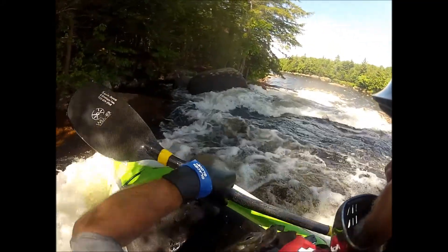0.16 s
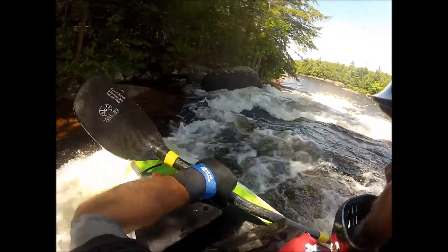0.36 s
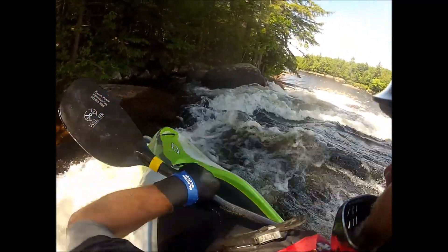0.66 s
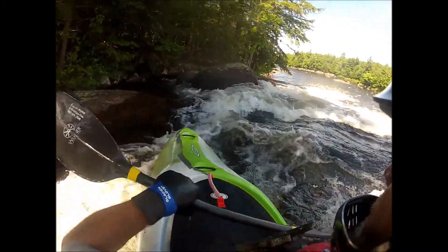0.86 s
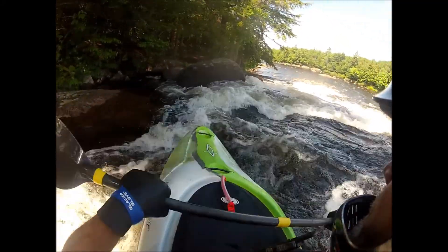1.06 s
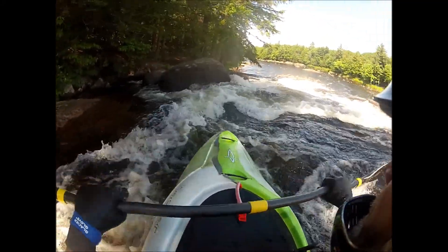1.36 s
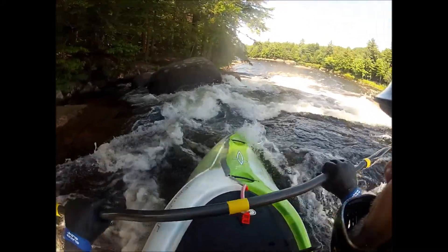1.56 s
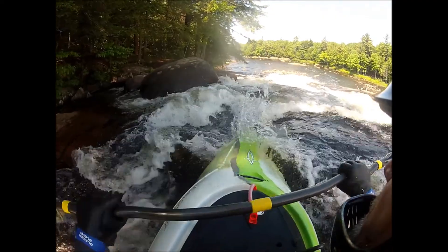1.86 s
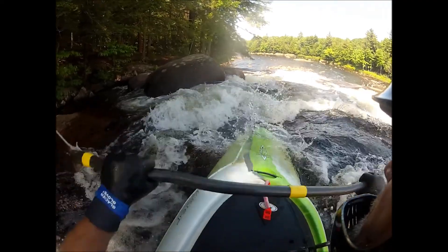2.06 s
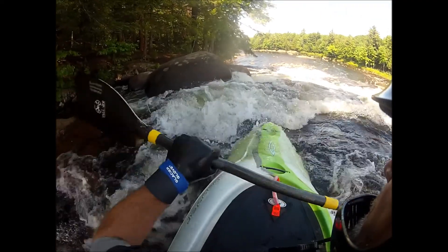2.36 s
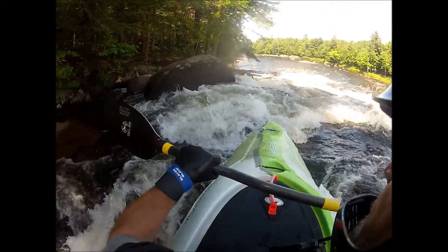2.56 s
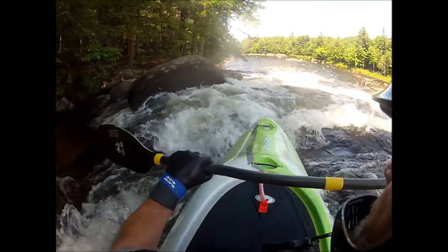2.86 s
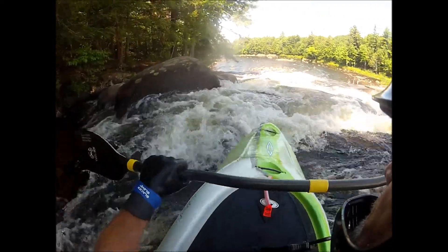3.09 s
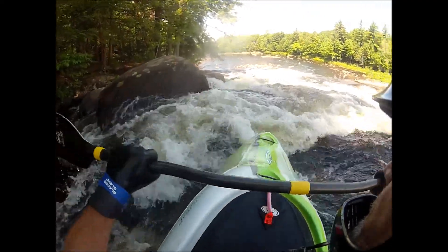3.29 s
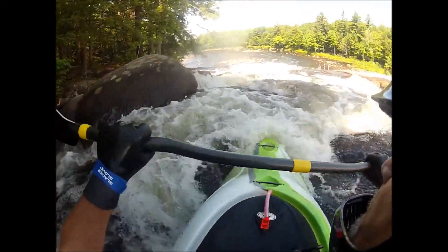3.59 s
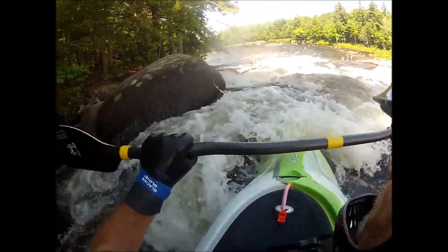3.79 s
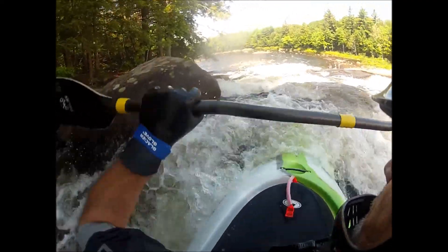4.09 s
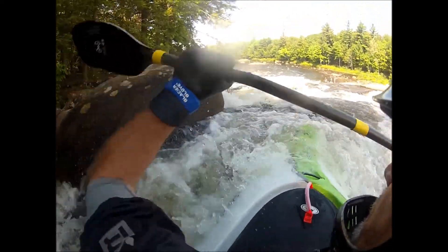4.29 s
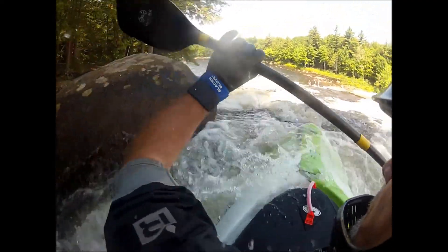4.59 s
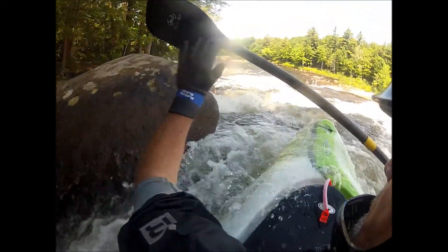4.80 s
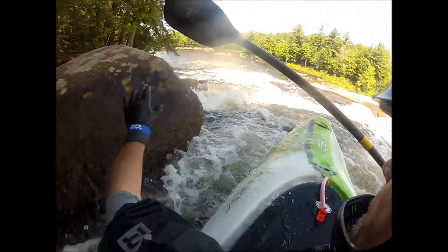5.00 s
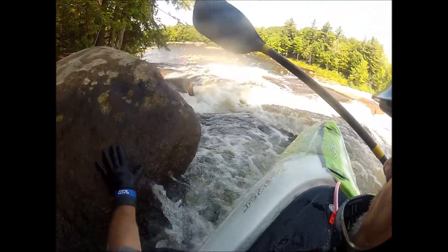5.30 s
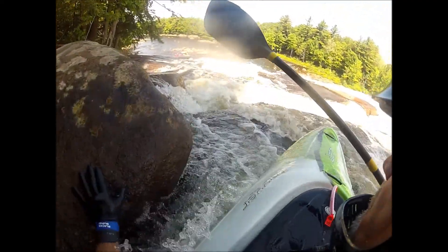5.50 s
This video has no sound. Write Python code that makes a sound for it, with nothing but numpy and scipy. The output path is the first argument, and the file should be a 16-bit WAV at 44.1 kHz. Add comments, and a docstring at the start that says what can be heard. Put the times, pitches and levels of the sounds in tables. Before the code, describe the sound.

Whitewater roars continuously around a kayak, heard from inside a closed waterproof camera housing, so it sounds boxy, midrange-heavy and tinny. Light taps of flung drops come early, a sharper knock at about 2.6 seconds, then a breaking wave brings churning, a very loud hollow crack near 3.8 seconds, low thuds and gulping air. The roar then steadies, with one more clear knock near the end. Both channels sound the same.

```python
"""A kayak runs a whitewater drop, heard from inside a camera's waterproof housing.
From the start, filtered noise and bubbles make the rapid's roar, and slow noise makes the rumble of waves.
Then flung drops knock on the shell as short ringing blows, spray patters on it and the treble dips briefly.
A breaking wave later churns the water, while sine tones rising in pitch make pockets of air gulp.
Throughout, the recorder holds its samples at a low rate, which adds a tinny sheen."""
import sys
import numpy as np
from scipy import signal
from scipy.fft import rfft, irfft, next_fast_len
from scipy.io import wavfile
from scipy.ndimage import map_coordinates

SR = 44100
rng = np.random.default_rng(int(sys.argv[2]) if len(sys.argv) > 2 else 0)


def persist_wave(psi):
    """Save psi, clipped to +-1, as 16-bit WAV."""
    counts = np.round(np.clip(psi, -1, 1) * 32767).astype(np.int16)
    wavfile.write(sys.argv[1], SR, np.atleast_2d(counts).T)


N = 249165

# Resonances of the housing: (pitch [Hz], width [Hz], level for outside sound [dB], level for a direct blow [dB])
HOUSING = [(539, 170, -3, -16.5), (787.6, 50, 2.5, 0.5), (905, 185, -2, -7), (1136.4, 109, -4, 2),
           (1264, 37, 2, -4.5), (1404, 71, -11, -18.5), (1906, 70, -23, -18.5)]
# Drops striking the housing; drops() adds 1 ms to the time and 1, 7 and 1 dB to the levels:
# (time [s], peak level of the ring [dB], level of the thud [dB], level of the crack [dB])
DROPS = [(0.381, -26, -38.5, -47), (0.733, -21.5, -40, -62.5), (2.564, -11, -38, -35.5),
         (3.575, -17.5, -22.5, -48.5), (3.788, 1, -28, -19.5), (3.829, -17, -26, -48),
         (4.051, -19, -24.5, -52), (4.434, -31.5, -30.5, -47.5), (4.538, -20, -38, -54),
         (4.583, -23, -36.5, -45), (4.878, -18.5, -41.5, -44.5), (5.458, -11, -37.5, -39)]


def amp(db):
    """Turn decibels into a gain."""
    return 10 ** (np.asarray(db) / 20)


def unit(x):
    """Scale a sound to an rms (average strength) of 1."""
    return x / np.sqrt(np.mean(x ** 2) + 1e-20)


def curves(rows):
    """Draw straight lines between the rows: one value per sample for each column after the time."""
    times, *columns = np.transpose(rows)
    t = np.arange(N) / SR
    return [np.interp(t, times, column) for column in columns]


def wobble(rate):
    """Make a smooth random curve through `rate` random points a second."""
    points = rng.standard_normal(400)
    return map_coordinates(points, [np.arange(N) * rate / SR], mode="wrap")


def filtered(x, response):
    """Multiply each frequency in x by response(Hz), which may be complex."""
    n = x.shape[-1]
    padded = next_fast_len(n + SR // 10)  # room for ringing after the end
    spectrum = rfft(x, padded) * response(np.fft.rfftfreq(padded, 1 / SR))
    return irfft(spectrum, padded)[..., :n]


def coloured(x, spectrum):
    """Shape x by (Hz, dB) points joined on a log pitch axis, then scale it to rms 1."""
    f, db = np.transpose(spectrum)
    return unit(filtered(x, lambda hz: amp(np.interp(np.log(hz + 1), np.log(f), db))))


def resonate(x, modes):
    """Ring x through resonances (Hz, width Hz, dB), each of which rings only after it is driven."""
    def response(f):
        total = 0
        for k, (centre, width, db) in enumerate(modes):
            damping = 1j * f * width
            sign = (-1) ** k  # neighbouring modes move in opposite directions
            total = total + sign * amp(db) * damping / (centre ** 2 - f ** 2 + damping)
        return total
    return filtered(x, response)


def water(bubble_hz, per_second, cycles, spread_db, bubbles_db):
    """Mix turbulent noise with a crowd of bubbles, each a short ring rising in pitch; rms 1."""
    noise = rng.standard_normal(N)
    draw = rng.random((int(per_second * N / SR), 3))  # place, pitch and size of each bubble
    t = np.arange(SR // 40) / SR
    hz = bubble_hz * 2 ** (2 * draw[:, 1:2] - 1)  # up to an octave either way
    size = amp(spread_db * np.minimum(-np.log(1 - draw[:, 2:]), 4))  # many small, few large
    age = hz * t / cycles
    rising = 1 + 0.044 * np.minimum(age, 2)
    rings = size * np.exp(-2 * age) * np.sin(2 * np.pi * hz * t * rising)
    where = (draw[:, :1] * N).astype(int) + np.arange(len(t))
    crowd = np.bincount(where.ravel(), rings.ravel(), N)[:N]
    return unit(noise + amp(bubbles_db) * unit(crowd))


def rapid():
    """Breaking water drives the upper housing modes, slosh the lower; churn lies below, spray hiss above."""
    # strength of the rapid, strongest at the start: (time [s], level [dB])
    strength_points = [(0.0, -41), (0.33, -41.5), (1.49, -43.5), (1.87, -45), (2.63, -44), (3.01, -44.5),
                       (3.93, -42.5), (4.58, -44.5), (5.65, -44)]
    # level of the spray hiss, lowest at the end: (time [s], level [dB])
    treble_points = [(0, -48), (.5, -48.5), (2.2, -53), (3.5, -50.5), (4.7, -52), (5.4, -52.5), (5.65, -55)]
    # colour of the churning water: (pitch [Hz], level per Hz [dB])
    churn_spectrum = [(30, -16), (52, -3.5), (85, 0.5), (145, 0.5), (230, -2.5), (340, -6.5), (480, -8),
                      (900, -32.5)]
    # colour of the spray hiss: (pitch [Hz], level per Hz [dB])
    hiss_spectrum = [(900, -29.5), (1450, -0.5), (1650, -2.5), (2350, 1), (2800, -0.5), (3000, -12.5),
                     (4300, -18), (6000, -17.5), (7600, -18)]
    roar_db, slosh_db = 0.28, 0  # each against the strength of the rapid
    churn_start_db, wave_churn_db = -43.5, 4.5  # level at the start; gain inside the breaking wave
    churn_fade_db_per_s = 0.5  # the water calms as the drop falls behind

    strength_db, = curves(strength_points)
    treble_db, = curves(treble_points)
    modes = [(hz, width, db) for hz, width, db, _ in HOUSING]
    surge = wobble(13)  # shared by the roar, slosh and hiss

    foam = water(bubble_hz=1290, per_second=900, cycles=4.45, spread_db=2.5, bubbles_db=-12.5)
    roar = unit(resonate(foam, modes[3:])) * amp(strength_db + roar_db + 0.5 * surge)

    gurgle = water(bubble_hz=663, per_second=350, cycles=8.4, spread_db=2.5, bubbles_db=-13.5)
    slosh_level_db = strength_db + slosh_db + 0.16 * surge + 0.59 * wobble(24)
    slosh = unit(resonate(gurgle, modes[:3])) * amp(slosh_level_db)

    churn_db = churn_start_db - churn_fade_db_per_s * np.arange(N) / SR + wave_churn_db * in_wave()
    churn = coloured(rng.standard_normal(N), churn_spectrum) * amp(churn_db + 0.57 * wobble(19))

    spray = water(bubble_hz=2070, per_second=1200, cycles=3, spread_db=2.0, bubbles_db=-9.0)
    hiss = coloured(spray, hiss_spectrum) * amp(treble_db + 0.45 * surge)
    return roar + slosh + churn + hiss


def shaking():
    """How hard the camera shakes: each jolt builds up quickly and dies away over the underlying rocking."""
    # rocking of the camera, least on the smooth tongue of water: (time [s], level [dB])
    rocking_points = [(0, -43), (1.0, -46.5), (1.7, -52), (2.6, -47), (4.3, -35.5), (4.9, -45), (5.65, -39)]
    # waves jolting the boat: (time [s], peak level [dB], time to fall by 60 dB [s])
    jolts = [(0.0, -32, 0.52), (0.28, -37.5, .8), (0.65, -39, 0.46), (0.94, -40.5, 0.56),
             (2.28, -38.5, 0.8), (2.58, -31.5, 0.83), (3.02, -40, .6), (3.35, -35.5, 1.2), (3.53, -28, 1.1),
             (3.62, -25, 0.98), (3.83, -17.5, 0.3), (3.9, -20.5, 0.13), (4.06, -16.5, 0.57),
             (4.46, -21, 0.48), (4.53, -25, 0.73), (5.27, -35.5, .6)]
    jolt_rise_s = 0.025
    t = np.arange(N) / SR
    rocking_db, = curves(rocking_points)
    power = amp(rocking_db) ** 2
    for s, db, t60 in jolts:
        rise = np.clip((t - s) / jolt_rise_s, 0, 1)
        fall_db = 60 * np.maximum(t - s - jolt_rise_s, 0) / t60
        power += (rise * amp(db - fall_db)) ** 2
    return np.sqrt(power)


def rumble(top_hz=46):
    """The camera sways in slow, nearly even cycles as waves hit; its mount cannot follow faster jolts."""
    # colour of the swaying: (pitch [Hz], level per Hz [dB])
    sway_spectrum = [(8, -27.5), (18, -5.5), (30, -3.5), (35, -1), (45, -21.5), (80, -31), (200, -67)]
    sway = coloured(rng.standard_normal(N), sway_spectrum)
    even = sway / (np.abs(signal.hilbert(sway)) + 0.2)  # divide by its own swell to level the cycles
    return filtered(unit(even) * shaking(), lambda hz: 1 / np.sqrt(1 + (hz / top_hz) ** 10))


def peaked(x):
    """Scale a sound to a peak of 1."""
    return x / np.abs(x).max()


def damped(x, hz, width):
    """Ring x through a broad resonance and then one three times as broad; peak 1."""
    return peaked(resonate(resonate(x, [(hz, width, 0)]), [(hz, 3 * width, 0)]))


def drops(splat_db=-24, splat_t60=0.028, spread=0.0029, film_t60=0.073, hardening=0.51,
          thud_hz=270, thud_width_hz=330, crack_hz=1920, crack_width_hz=260):
    """Each drop hits the shell and flattens into a film that damps the ring; it adds a thud and a crack."""
    out = np.zeros(N + SR)
    t = np.arange(SR // 8) / SR
    contact = (1 - np.exp(-t / spread)) * amp(-60 * t / film_t60)  # spread and decay times in seconds
    for s, peak_db, thud_db, crack_db in DROPS:
        half_noise = rng.standard_normal(len(t)) / 2
        force = amp(splat_db - 60 * t / splat_t60) * half_noise
        force[0] += 1  # the first sharp contact
        # dB per octave: a harder blow is shorter, so it favours the higher modes
        tilt = hardening * (peak_db + 14.5)
        modes = [(hz, width, db + tilt * np.log2(hz / 1000)) for hz, width, _, db in HOUSING]
        ring = amp(peak_db + 1) * peaked(contact * resonate(force, modes))
        thud = amp(thud_db + 7.0) * damped(force, thud_hz, thud_width_hz)
        crack = amp(crack_db + 1.0) * damped(force, crack_hz, crack_width_hz)
        # fine spray thrown off the blow
        spit = amp(crack_db - 10.0 - 60 * t / 0.085) * rng.standard_normal(len(t))
        out[round((s + 0.001) * SR):][:len(t)] += ring + thud + crack + spit
    return out[:N]


def washes():
    """Crowds of fine droplets patter on the shell, in sheets of spray and just after each drop bursts."""
    # sheets of spray: (time of the middle [s], half length [s], level [dB])
    sheets = [(0.468, 0.022, -42), (1.514, .03, -39.5), (3.515, 0.07, -38), (3.765, 0.02, -38.5),
              (4.163, .06, -41), (4.981, 0.03, -38), (5.133, 0.0097, -43.5)]
    scatter_delay_s, scatter_half_s = 0.015, 0.01
    scatter_db, scatter_grows = -32, 0.35  # level for a table peak of 0 dB; dB per dB of that peak
    t = np.arange(N) / SR
    scatter = [(s + scatter_delay_s, scatter_half_s, scatter_db + scatter_grows * peak_db)
               for s, peak_db, _, _ in DROPS]
    level = sum(amp(db) * np.exp(-((t - s) / half) ** 2 / 2) for s, half, db in sheets + scatter)
    patter = water(bubble_hz=960, per_second=1500, cycles=1.5, spread_db=1.5, bubbles_db=-1)
    modes = [(hz, width, db) for hz, width, _, db in HOUSING]
    return level * unit(resonate(patter, modes))


def dipped(x):
    """The treble drops away for a few milliseconds now and then, by turning down a high band."""
    # brief dips of the treble: (time [s], half length [s])
    dips = [(0.998, 0.008), (2.642, 0.0081), (3.612, 0.014), (3.671, .008), (4.326, 0.004), (4.462, 0.009),
            (4.505, 0.0031), (5.498, 0.0071), (5.548, 0.0055), (5.606, 0.0073)]
    t = np.arange(N) / SR
    depth_db = 19.5 * sum(np.exp(-((t - s) / half) ** 2) for s, half in dips)
    treble = filtered(x, lambda hz: 1 - 1 / (1 + (hz / 1520) ** 16))
    return x - treble * (1 - amp(-depth_db))


def in_wave():
    """1 while the boat ploughs through the breaking wave, 0 outside it, with a ramp at each end."""
    enter_s, leave_s, ramp_s = 3.15, 4.42, 0.2
    t = np.arange(N) / SR
    return np.clip(np.minimum(t - enter_s, leave_s - t) / ramp_s + 0.5, 0, 1)


def gulps(rise=0.058, attack=0.00062):
    """Each pocket of air rings in the water and rises a little in pitch as it nears the surface."""
    # pockets of air by the hull:
    # (time [s], starting pitch [Hz], level before onset and decay [dB], time to fall by 60 dB [s])
    pockets = [(3.584, 188, -35, 0.13), (3.79, 400, -21, 0.065), (3.832, 140, -24.5, 0.062),
               (4.055, 213, -27, 0.077), (4.388, 106, -24, 0.083), (4.436, 126.6, -23, 0.056),
               (4.541, 464, -29.5, 0.087), (4.472, 2150, -39, .06)]
    out = np.zeros(N + SR)
    t = np.arange(SR // 4) / SR
    for s, hz, db, t60 in pockets:
        envelope = amp(db - 60 * t / t60) * (1 - np.exp(-t / attack))  # attack in seconds
        rising = 1 + rise * np.minimum(t / t60, 1)
        out[round(s * SR):][:len(t)] += envelope * np.sin(2 * np.pi * hz * t * rising)
    return out[:N]


def scene():
    """The closed housing gives both channels the same sound."""
    mono = dipped(rapid() + washes() + drops()) + gulps() + rumble()
    return np.array([mono, mono])


def record(dry, ceiling=0.53, mirror_hz=330):
    """Hard knocks overload the microphone; holding low-band samples mirrors them around the hold rate."""
    hold_hz, top_hz = 6000, 7680  # rate of the held samples; highest pitch kept
    loaded = dry / (1 + (dry / ceiling) ** 4) ** (1 / 4)  # rounds off peaks near the ceiling
    narrow = filtered(loaded, lambda hz: 1 / (1 + (hz / 2950) ** 80))
    upper = filtered(dry, lambda hz: hz > hold_hz / 2)
    # the bass is mirrored less
    bright = filtered(narrow, lambda hz: 0.49 + 0.51 * hz / np.hypot(hz, mirror_hz))
    mirrored = narrow + 2 * bright * np.cos(2 * np.pi * hold_hz * np.arange(N) / SR)

    def hold_response(hz):
        """Holding a sample weakens the highs (sinc); a gentle curve then lifts them."""
        lift_db = np.interp(hz, [3000, 4800, 7200], [0.8, 1.2, 2.2])
        return np.sinc(hz / hold_hz) * amp(lift_db)

    held = filtered(mirrored, hold_response)
    return filtered(held + amp(-6) * upper, lambda hz: np.clip((top_hz - hz) / 80, 0, 1))


dry = scene()
out = record(dry)
persist_wave(out)
```